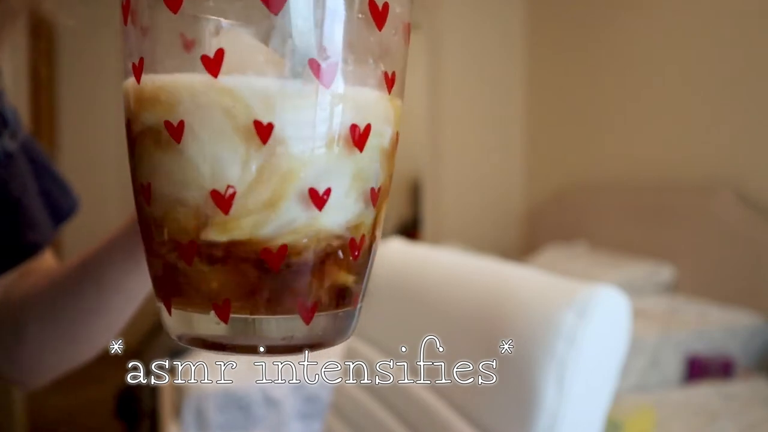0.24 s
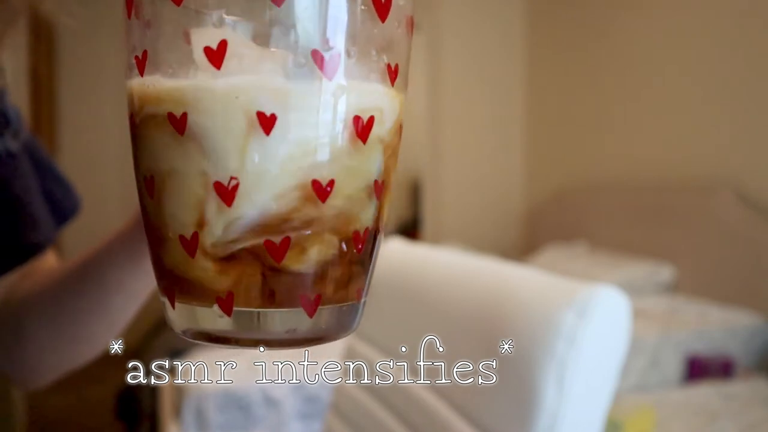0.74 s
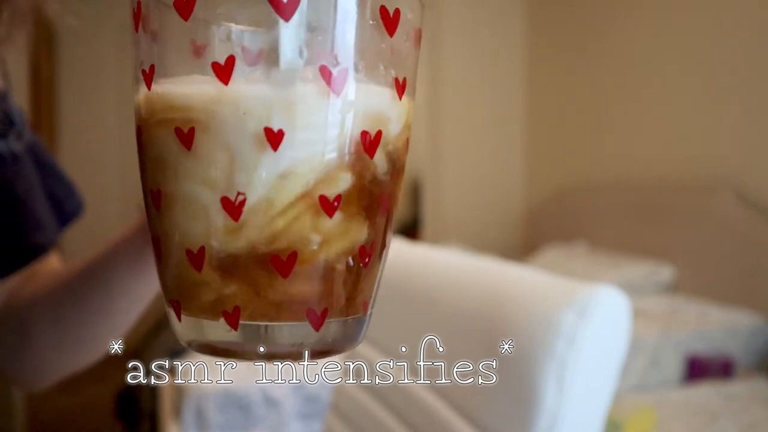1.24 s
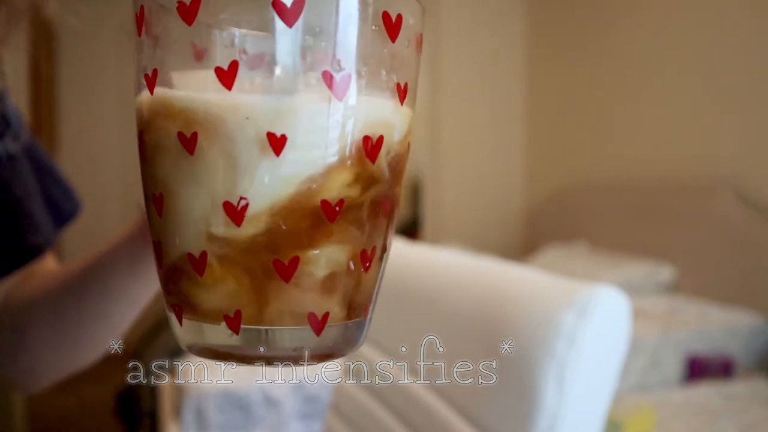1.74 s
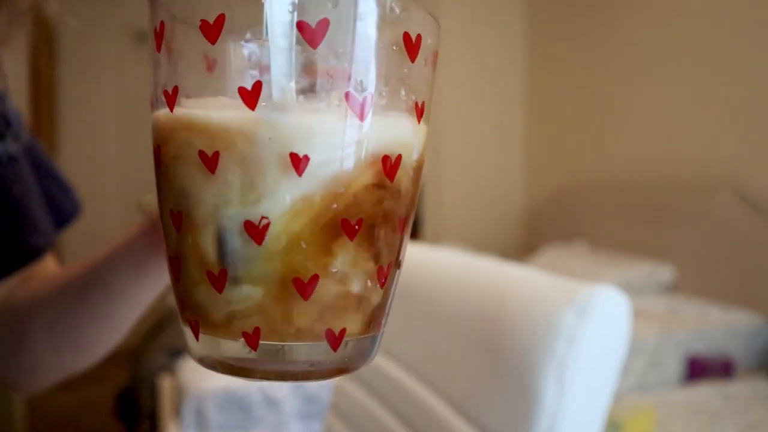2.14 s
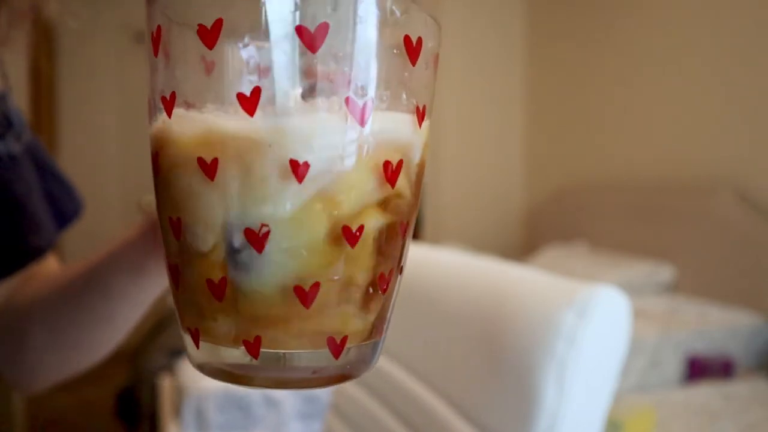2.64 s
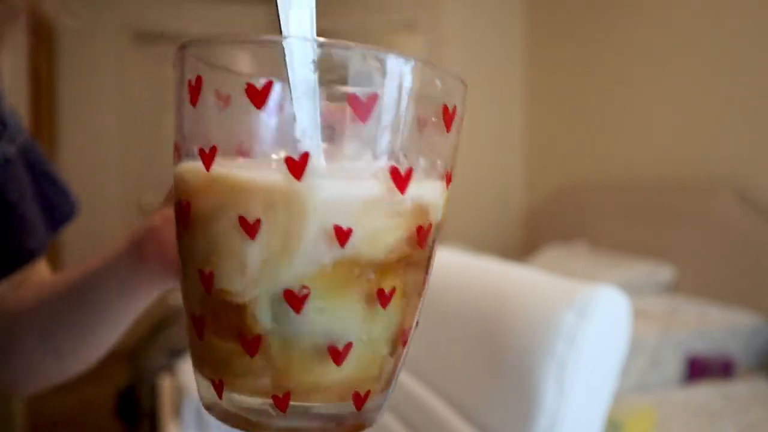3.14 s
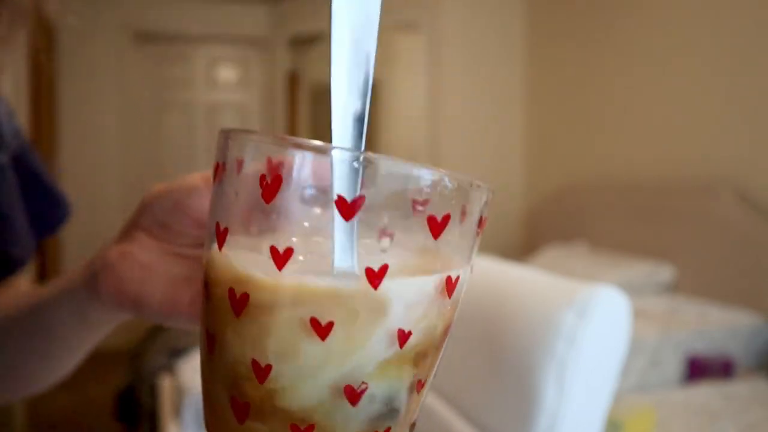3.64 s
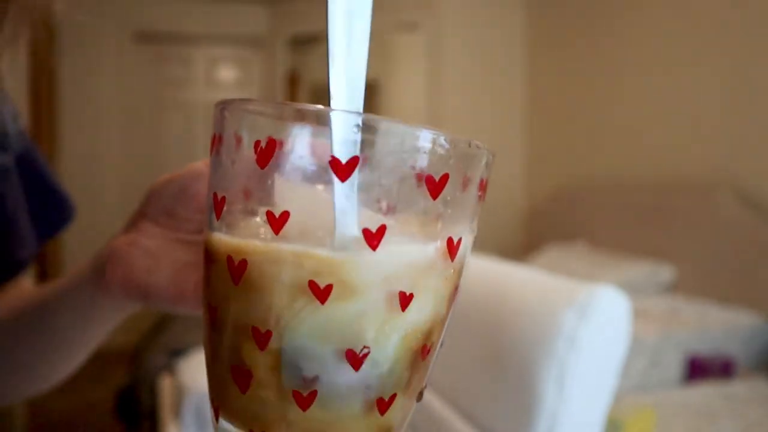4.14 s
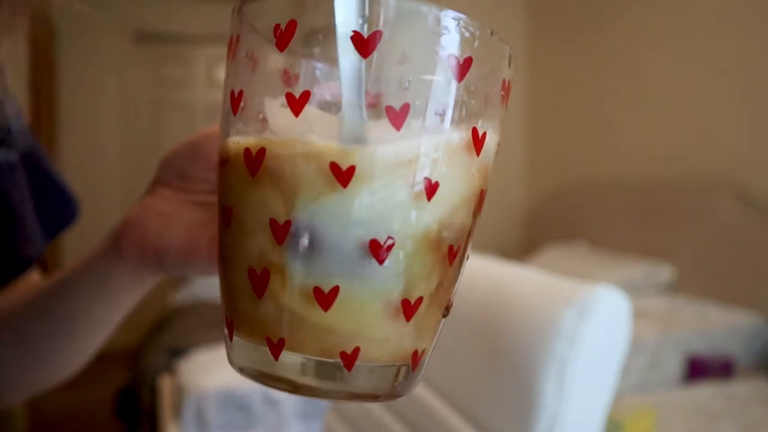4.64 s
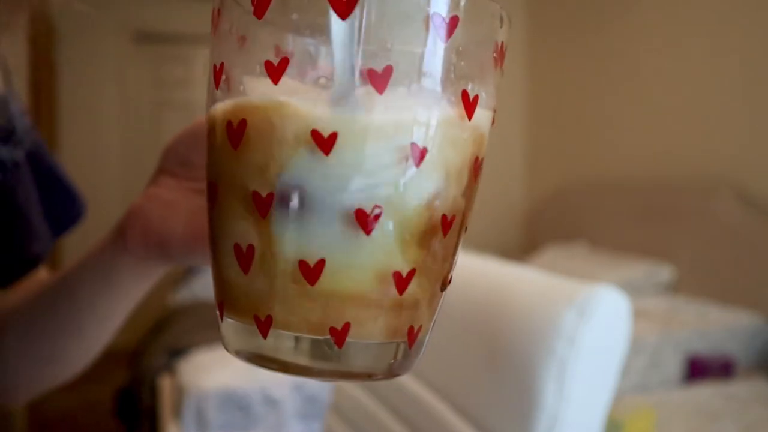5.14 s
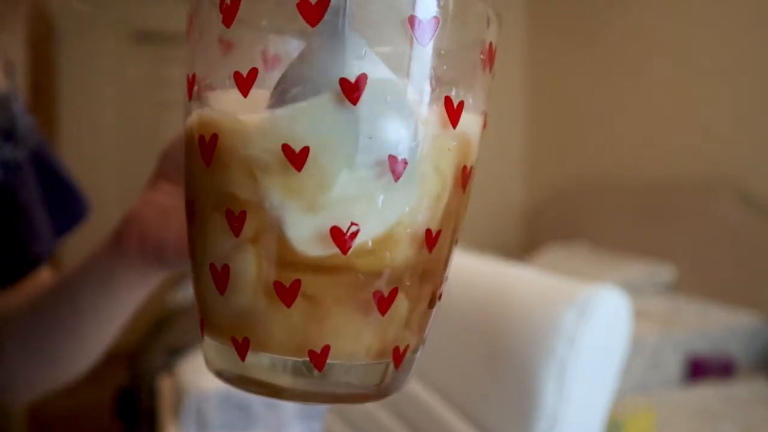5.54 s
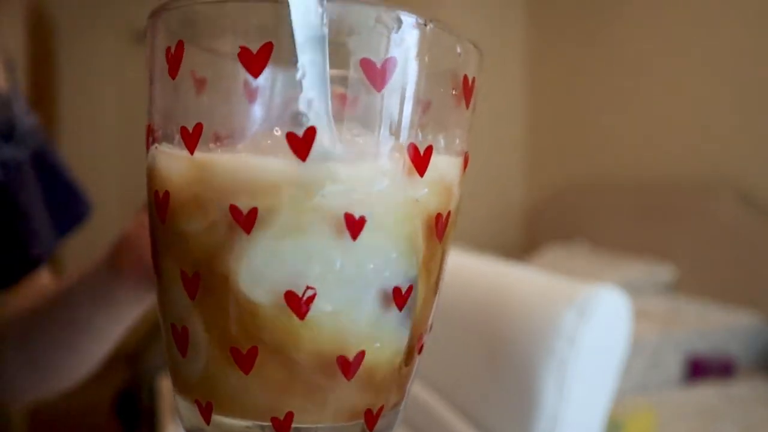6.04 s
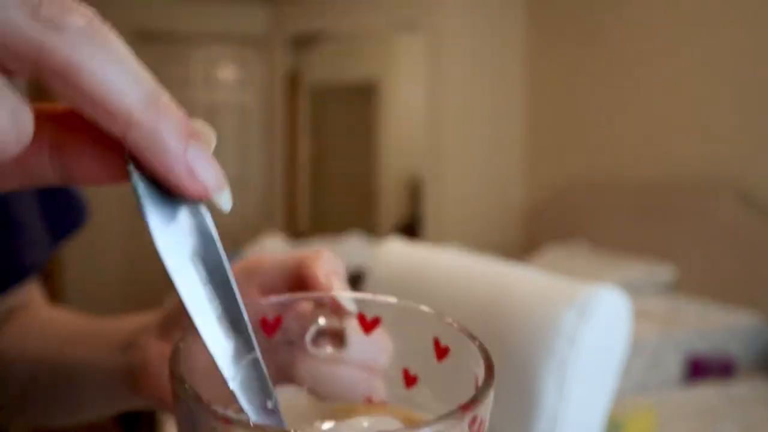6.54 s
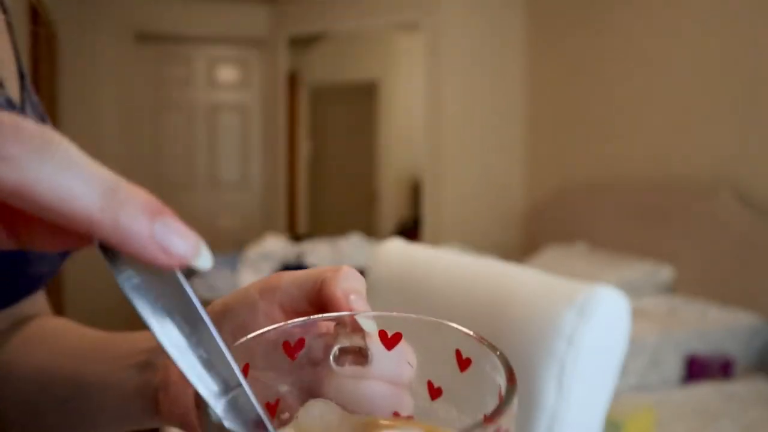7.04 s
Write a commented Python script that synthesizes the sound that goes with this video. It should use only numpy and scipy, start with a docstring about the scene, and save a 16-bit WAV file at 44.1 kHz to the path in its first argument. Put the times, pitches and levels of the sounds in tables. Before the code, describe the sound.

A steel spoon stirs an iced milky drink in a hand-held glass, clinking brightly and irregularly with dull ice clacks, close up in a small quiet room.

```python
"""Stirring an iced drink

A steel spoon stirs an iced milky drink in a hand-held glass, close to a stereo microphone.
Each clink is a sum of quickly fading tones plus a short crack of noise; the drink damps the ring.
Grazes are trains of tiny blows, and hand bumps are low sine swells. Two noisy resonances make a
hollow knock and a chatter on the rim. A small room answers with random echoes, over a faint hum."""
import sys
import numpy as np
from scipy import signal
from scipy.fft import rfft, irfft
from scipy.io import wavfile
from scipy.ndimage import uniform_filter1d, minimum_filter1d

SR = 44100
rng = np.random.default_rng(int(sys.argv[2]) if len(sys.argv) > 2 else 0)


def wrap_up_sound(samples):
    """Save the sound to the file named by the first command line argument, as 16-bit audio."""
    columns = np.atleast_2d(samples).T
    # keep every value between -1 and 1, then stretch to whole-number steps
    tamed = np.clip(columns, -1, 1)
    steps = np.round(tamed * 32767).astype(np.int16)
    wavfile.write(sys.argv[1], SR, steps)


N = 321029

SIZE = 4096  # samples in one blow
BINS = np.fft.rfftfreq(SIZE, 1 / SR)  # its frequencies in Hz
WALL_HZ = 1690  # reference pitch of the glass wall
MARGIN_S = .002  # short wait before each blow, leaving room for the lead between microphones

# edges of the ten pitch ranges in which a contact is coloured: edge_hz
REGISTERS = [1000, 1450, 2000, 2700, 3600, 4300, 5000, 5600, 8000, 9000, 13000]
# how alike the two microphones hear the glass: pitch_hz, likeness (0-1)
LIKENESS = [(1200, 0.98), (1700, 0.29), (2400, .4), (3900, 1), (6000, 0.51), (9000, .7), (12000, 0.68)]
# the spoon's tip hits the wall and bounces: start_s, level_db, favoured_steel_hz
TINGS = [(0.2883, -25, 6500), (0.8166, -23, 6200), (1.3923, -21, 4700), (1.8946, -19.5, 7900),
         (2.414, -20, 4700), (2.904, -22, 6500)]
# the spoon's bowl meets the side: start_s, level_db, brightness_db (per octave), body_db
CLINKS = [(0.0951, -52, 2.5, 6), (0.124, -38, -9.5, -1.5), (0.606, -34.5, 0.5, 6),
          (0.6275, -40, -0.5, 10.5), (0.637, -43, 3.5, 3), (0.6724, -35.5, -7.5, 2),
          (0.765, -43.5, 1.5, -7.5), (0.802, -43.5, -4.0, 7), (1.003, -45.0, -7.5, 0.5),
          (1.1899, -35.5, -0.5, -7.5), (1.216, -32.5, -2.5, 6.5), (1.309, -47, -1.5, 7),
          (1.321, -28, 1.5, 5), (1.6908, -35.5, -1.5, 0), (1.7029, -39.5, 4, -3), (2.0494, -37, 2.5, 2),
          (2.221, -35.0, -1, -3), (2.6707, -34, -11.5, 5), (2.7612, -33, 0, -2), (2.8779, -36, -4, 5.5),
          (2.977, -43, 1, -10), (3.7937, -31.5, 1, -3.5), (3.9324, -35.5, 6, 3), (3.984, -15, 4.5, -3),
          (4.161, -38, 1.0, 8.5), (4.348, -39, 3, 4.5), (4.3942, -42.5, -10.5, -3.5), (4.4872, -26, 6, 1.5),
          (4.4964, -18.5, 4, -1.5), (4.8133, -35, 3.0, -2.5), (4.853, -28, -3.5, 1), (4.9166, -32, 4, 4),
          (4.9669, -36.5, -5.5, 3), (4.9886, -22, 3.5, -2.5), (5.2733, -43, 1.5, 8),
          (5.3326, -32.5, 2.5, 0), (6.511, -43.5, -4.5, -2), (6.601, -49.0, -20, -11.5)]


def gain_of(db):
    """Turns decibels into amplitude."""
    return 10 ** (np.asarray(db) / 20)


def evened(x):
    """Scales a sound to an rms of 1."""
    return x / np.sqrt(np.mean(x ** 2) + 1e-20)


def read(points, hz):
    """Reads values between the points of a table, evenly along log frequency."""
    f, value = np.transpose(points)
    return np.interp(np.log(hz + 1), np.log(f + 1), value)


def fade(t, t60):
    """Falls by 60 dB in t60 seconds."""
    return np.exp(-np.log(1000) * t / np.maximum(t60, 1e-4))


def add(mix, s, sound):
    """Adds a sound into the mix at time s in seconds."""
    part = mix[..., round(s * SR):][..., :sound.shape[-1]]
    part += sound[..., :part.shape[-1]]


def causal(db):
    """Makes a filter with the given gains that never sounds before the blow (minimum phase)."""
    cepstrum = irfft(np.log(gain_of(db)))
    # fold the backward half of the response onto the forward half
    cepstrum[..., 1:SIZE // 2] *= 2
    cepstrum[..., SIZE // 2 + 1:] = 0
    return np.exp(rfft(cepstrum))


def pair(z, likeness):
    """Blends two unrelated spectra into partly alike left and right ones."""
    c = np.clip(likeness, -1, 1)
    return np.array([z[0], c * z[0] + np.sqrt(1 - c ** 2) * z[1]])


def air(waver=0.86, waver_hz=4, low_cut_hz=46):
    """Still room air is steady shaped noise, with hum tones whose phase and strength waver."""
    # shape of the noise before its overall level is set: pitch_hz, density_db (per Hz)
    noise_shape = [(15, -45), (25, -7.5), (76, -7.5), (114, -12.5), (217, -8), (263, -10.5), (335, -8.5),
                   (591, -14.5), (863, -13.5), (1040, -24), (1260, -19.5), (1650, -24), (2050, -26.5),
                   (2410, -25.5), (16000, -57.5)]
    # how alike left and right noise are: pitch_hz, likeness (0-1)
    air_likeness = [(60, .995), (180, .92), (350, .78), (700, .55), (1500, .2), (5000, 0)]
    # hum tones: pitch_hz, level_db (rms)
    hum_tones = [(73, -74.5), (334, -79.5)]
    air_db = -63.5  # rms
    hz, t = np.fft.rfftfreq(N, 1 / SR), np.arange(N) / SR
    z = pair(rfft(rng.standard_normal((2, N))), read(air_likeness, hz))
    z = z * hz ** 2 / np.sqrt(hz ** 4 + low_cut_hz ** 4)
    noise = irfft(z * gain_of(read(noise_shape, hz)), N)
    out = gain_of(air_db) * evened(noise)
    for hum_hz, db in hum_tones:
        slow = rfft(rng.standard_normal(N)) * np.exp(-(hz / waver_hz) ** 2)
        drift = evened(irfft(slow, N))
        tone = np.sin(2 * np.pi * hum_hz * t + drift)
        # the same drift, one second later, moves the strength
        out = out + gain_of(db) * evened(tone * (1 + waver * np.roll(drift, SR)))
    return out


def strike(wall_hz, t60, crack_db=1, crack_t60=0.005, spread_db=4, detune=.016):
    """A blow sets off fading tones of glass and spoon plus a short crack, seen from two sides."""
    # tones of the filled glass and the spoon: pitch_hz, level_db, share of the ring's t60 (ratio)
    modes = [(1050, -30, .4), (1319.6, -6, 3.4), (1595.5, 1.5, 1.0), (1692, 3.5, 1.4), (1808, -3, 0.18),
             (2200, -12.5, 0.72), (2560, -3.5, 0.31), (3056, -3, .45), (3143, -1, 0.48), (3887, 0.5, 0.93),
             (3978, 3.5, 0.76), (4360, -11, .5), (4600, -5.5, .45), (4740, -1.5, .5), (5000, -9.5, .4),
             (5540, -7.5, 0.43), (6224, -3.5, 0.34), (6500, -7.5, 0.49), (6920, -3, 0.48),
             (7300, -4.5, 0.22), (7700, -5.5, 0.43), (8420, -6, .5), (8500, -10.5, 0.17), (9440, -7, .4),
             (10410, -4, 0.36), (10950, -6, 0.43), (12050, -5.5, 0.5)]
    # how strongly the glass sends out sound: pitch_hz, gain_db
    radiation = [(200, -72), (600, -43), (860, -26.5), (980, -4), (12000, 2.5), (12600, -13.5),
                 (14000, -17), (16500, -26)]
    t = np.arange(SIZE) / SR
    hz, db, share = np.transpose(modes)
    low = hz < REGISTERS[2]
    # the drink climbs and falls on the wall and shifts its lowest tones
    hz = np.where(low, hz * wall_hz / WALL_HZ, hz)
    hz = hz * (1 + detune * rng.standard_normal(len(hz)))
    # low tones all start with the push; the point of contact decides the signs of the others
    push_sign = rng.choice([-1, 1], (2, 1))
    sign = np.where(low, push_sign, rng.choice([-1, 1], (2, len(hz))))
    weight = sign * gain_of(db + spread_db * rng.standard_normal((2, len(hz))))
    # the second side is a quarter of a cycle on
    side_phase = np.array([0, np.pi / 2])[:, None, None]
    phase = 2 * np.pi * hz[:, None] * t + side_phase
    fading = np.sin(phase) * fade(t, t60 * share[:, None])
    ring = np.sum(weight[..., None] * fading, 1)
    crack = gain_of(crack_db) * rng.standard_normal((2, SIZE)) * fade(t, crack_t60)
    return rfft(ring + crack) * causal(read(radiation, BINS))


def touch(ting_hz, knock_db, ting_db=8, ting_width_hz=520, full_knock_db=-12):
    """A point of contact favours a group of steel tones; a light touch misses the deepest ones."""
    steel = ting_db / (1 + ((BINS - ting_hz) / ting_width_hz) ** 2)
    depth = np.clip((REGISTERS[1] - BINS) / (REGISTERS[1] - REGISTERS[0]), 0, 1)
    return causal(steel + depth * np.clip(knock_db - full_knock_db, -20, 0))


def voiced(z, levels_db, order=11, count=3):
    """Sets the strength of each pitch range by repeated smooth filtering, for bright or dull contacts."""
    register = np.digitize(BINS, REGISTERS[1:-1])
    member = register[:, None] == np.arange(len(levels_db))
    member = member * (BINS > REGISTERS[0])[:, None]
    for _ in range(count):
        # power as if the whole blow lasted a hundredth of a second
        power = 2 * abs(z) ** 2 @ member / (SIZE * SR * .01)
        lift_db = (levels_db - 10 * np.log10(power + 1e-20))[:, register]
        smooth_db = uniform_filter1d(uniform_filter1d(lift_db, 2 * order + 1), order)
        z = z * causal(smooth_db)
    return z


def microphones(z, left_db=0, lean_below_hz=5000):
    """Two microphones hear the glass with differing level and timing; low tones lean to one side."""
    # left against right level: pitch_hz, left_minus_right_db
    balance = [(1200, 2.5), (1700, -1), (2400, -3.5), (3200, 2), (4000, 5.5), (4800, 2), (6000, 0.5),
               (8000, -0.5), (12000, -2)]
    # how far left is ahead of right: pitch_hz, lead (radians)
    lead = [(1200, -0.63), (1750, -1.02), (2300, 0.79), (3200, 0.69), (4000, 0.99), (6000, .9), (8000, 1.2),
            (10000, 1.8), (12000, 1.9)]
    balance_db = read(balance, BINS) + left_db / (1 + (BINS / lean_below_hz) ** 2)
    lean = gain_of(balance_db / 2) * np.exp(.5j * read(lead, BINS))
    ports = np.array([lean, 1 / lean]) * np.exp(-2j * np.pi * BINS * MARGIN_S)
    ports = ports / np.sqrt(np.mean(abs(ports) ** 2, 0))
    sound = irfft(pair(z, read(LIKENESS, BINS)) * ports)
    # full for the first half of the block, then fading to silence
    return sound * np.minimum(2 * np.linspace(1, 0, SIZE), 1) ** 2


def contact(db, brightness_db, body_db, colour_db, wall_hz, ting_hz, t60, rebound, left_db,
            steel_db=0, rebound_s=.0039, steel_width_hz=520):
    """A contact rings the glass, and a weaker second blow follows as it rebounds."""
    # how far each pitch range follows the body setting: share (0-1)
    body_share = [.8, 0, .8, 1, .5, 0, 0, 0, 0, 0]
    # this hard or harder rebounds in full; softer contacts rebound less (dB per dB)
    hard_db, rebound_slope = -20.5, .6
    centres = np.sqrt(np.multiply(REGISTERS[:-1], REGISTERS[1:]))
    octaves = np.maximum(np.log2(centres / WALL_HZ), 0)
    steel = steel_db / (1 + ((centres - ting_hz) / steel_width_hz) ** 2)
    levels_db = db + np.array(colour_db) + brightness_db * octaves
    levels_db = levels_db + body_db * np.array(body_share) + steel
    share = rebound * gain_of(rebound_slope * min(db - hard_db, 0))
    delay_s = rebound_s * rng.uniform(.92, 1.08)
    bounce = share * np.exp(-2j * np.pi * BINS * delay_s)
    z = strike(wall_hz, t60) + bounce * strike(wall_hz, t60)
    z = z * touch(ting_hz, levels_db[0] - levels_db[1])
    return microphones(voiced(z, levels_db), left_db)


def clinks():
    """Spoon and ice strike the glass, each in the manner of its kind."""
    # deep blows low on the glass: start_s, level_db, brightness_db (per octave), body_db,
    # favoured_steel_hz
    knock_rows = [(1.045, -19.5, 0, 0.5, 7200), (2.0611, -19.5, -1.5, 0, 4500),
                  (2.5556, -22.5, -.5, -3, 4600), (4.175, -19.5, 2, 4, 5300), (4.7018, -24, 1, 3, 6700),
                  (5.281, -26.5, 0.5, 0, 4600), (6.206, -21.5, -2.5, 3.5, 5250),
                  (6.2113, -22.5, -2, -0.5, 5150), (6.7709, -19.5, -.5, -2.5, 8300)]
    # dull, short clacks of ice: start_s, level_db, brightness_db (per octave), body_db
    clack_rows = [(0.5625, -70, 9.5, 14.5), (1.568, -24, 0.5, 0), (1.7101, -25, -2.5, 6),
                  (1.829, -34.5, 4.5, -3), (1.8369, -31.5, -0.5, 1.5), (2.2431, -23.5, 0, -1),
                  (2.7173, -43, 1, -9), (2.7748, -23, -1, 4), (3.3188, -31, -5, 3.5),
                  (3.3801, -31, -3, 1.5), (3.8635, -23.5, 1.5, 2.5), (4.2798, -29.5, -6.5, -3.5),
                  (4.8927, -25, 2.5, -3), (5.347, -28.5, 1, 0), (5.402, -27, 0, -0.5),
                  (6.265, -36.5, 0.5, -2.5), (6.4394, -29, 2.0, 3), (6.451, -42, 0, 0),
                  (6.4923, -49.5, 7.5, -5.5)]
    # thin ticks of the handle on the rim: start_s, level_db, brightness_db (per octave), body_db
    tick_rows = [(0.2426, -56, 2, -21), (0.7819, -35.5, -4.5, -6), (1.6548, -47.5, -6, -1),
                 (1.8679, -44, 1.5, -8), (2.0215, -67.5, 11.5, -10), (2.1582, -57.5, -1.0, 6),
                 (2.3819, -41, 2, 3), (2.8597, -39, -1, 3), (3.2883, -64.5, 2, 1), (5.2234, -61.5, -6.5, 3),
                 (5.5685, -70, -0.5, 2)]
    # ways of touching: colour_db (per pitch range), wall_hz, ting_hz (favoured steel tones) or
    # steel_db (how far they stand out), t60 (s), rebound (0-1), left_db (lean to the left)
    ting_kind = dict(colour_db=[-21.5, 0.5, -10.5, -16.5, -4, -4.5, -18.5, -1, -15, -1],
                 wall_hz=1622, steel_db=2, t60=0.035, rebound=0.65, left_db=3.5)
    # a deep blow: same columns, with steel_db
    knock_kind = dict(colour_db=[-15.5, -0.5, -7, -5.5, -5, -13.5, -15, -9.5, -13, -12.5],
                  wall_hz=1732, steel_db=7.5, t60=.023, rebound=0.26, left_db=-0.5)
    # an ice clack: same columns, with ting_hz
    clack_kind = dict(colour_db=[-30, -0.5, -11.5, -5, -2.5, -15, -24, -20, -25.5, -26],
                  wall_hz=1730.5, ting_hz=8400, t60=.018, rebound=.05, left_db=3)
    # a clink of the bowl: same columns, with ting_hz
    clink_kind = dict(colour_db=[-27, 0, -16, -13, -8, -16.5, -22.5, -15, -23.5, -20.5],
                  wall_hz=1702.5, ting_hz=4700, t60=.032, rebound=.35, left_db=1.5)
    # a tick of the handle: same columns, with ting_hz
    tick_kind = dict(colour_db=[-22, 0.5, -17, -8, 8.5, -0.5, -10, 4, -15.5, -4.5],
                 wall_hz=1730, ting_hz=6300, t60=0.025, rebound=.1, left_db=3.5)
    out = np.zeros((2, N))
    for s, db, ting_hz in TINGS:
        add(out, s - MARGIN_S, contact(db, 0, 0, ting_hz=ting_hz, **ting_kind))
    for s, db, brightness_db, body_db, ting_hz in knock_rows:
        add(out, s - MARGIN_S, contact(db, brightness_db, body_db, ting_hz=ting_hz, **knock_kind))
    for rows, kind in [(clack_rows, clack_kind), (CLINKS, clink_kind), (tick_rows, tick_kind)]:
        for s, db, brightness_db, body_db in rows:
            add(out, s - MARGIN_S, contact(db, brightness_db, body_db, **kind))
    return out


def slide(length, db, slips_per_s=260, uneven_db=4, ring_t60=.035):
    """A sliding spoon catches and slips: a train of tiny soft blows on the same glass."""
    # softness of the blows: pitch_hz, gain_db
    softness = [(1000, -21.5), (1400, -15.0), (1650, 2), (2200, -7.5), (4000, -11.5),
                (7000, -19.0), (12000, -25.0)]
    n = max(round(length * SR), 2)
    slips = rng.random(n) < slips_per_s / SR
    slips = slips * gain_of(uneven_db * rng.standard_normal(n))
    slips[0] = 1
    ring = microphones(strike(WALL_HZ, ring_t60) * causal(read(softness, BINS)))
    sound = signal.fftconvolve(slips[None], ring, axes=1)
    # level counts all the energy, ring included, over the length of the slide
    return gain_of(db) * sound / np.sqrt(np.sum(sound ** 2) / (2 * n))


def grazes():
    """The spoon slides into each ting, drags faintly after each clink, and scrapes a few times."""
    # longer scrapes along the glass: start_s, end_s, level_db
    scrapes = [(0.767, .811, -47), (1.531, 1.575, -51), (2.024, 2.066, -58.5), (3.3, 3.416, -50.5),
               (3.786, 3.851, -44.5), (3.911, 3.99, -45), (4.291, 4.422, -51), (4.81, 4.945, -50.5),
               (5.302, 5.435, -58)]
    run_up_s, run_up_db = 0.032, -25.5  # level against the ting
    drag_s, drag_db = .03, -60.5
    out = np.zeros((2, N))
    for s, db, _ in TINGS:
        add(out, s - run_up_s, slide(run_up_s, db + run_up_db))
    for s, *_ in CLINKS:
        add(out, s, slide(drag_s, drag_db))
    for start, end, db in scrapes:
        add(out, start, slide(end - start, db))
    return out


def room(x, first_s=0.0056, build_s=0.0013, half_cycles_per_s=1.3, count=3):
    """Walls send back dense echoes that die by pitch; their pattern changes as the glass moves."""
    # how long echoes last: pitch_hz, t60_s
    echo_t60 = [(600, 0.37), (1700, 0.1837), (4000, 0.2365), (8000, 0.21), (13000, 0.2)]
    # how strongly the room answers: pitch_hz, gain_db
    echo_db = [(600, -8), (1700, -8.5), (2700, -10), (4000, -15.5), (7000, -15.5), (12000, -14)]
    t = np.arange(SR // 2) / SR
    source, wet = (x[0] + x[1]) / 2, np.zeros((2, N))
    for k in range(count):
        # scattered random echoes, none before the first
        taps = rng.standard_normal((2, len(t))) * (rng.random((2, len(t))) < .15)
        taps = taps * np.clip((t - first_s) / build_s, 0, 1)
        hz, age, z = signal.stft(taps, SR, nperseg=128)
        z = z * fade(age, read(echo_t60, hz)[:, None])
        plain = signal.istft(z, SR)[1]
        coloured = signal.istft(z * gain_of(read(echo_db, hz))[:, None], SR)[1]
        tail = coloured / np.sqrt(np.sum(plain ** 2) / 2)
        # the echo patterns take turns smoothly
        place = np.cos(np.pi * (half_cycles_per_s * np.arange(N) / SR + k / count))
        place = place * np.sqrt(2 / count)
        wet += signal.fftconvolve(place * (x + source) / np.sqrt(3), tail, axes=1)[:, :N]
    return wet


def bumps():
    """The hand that holds the glass makes low, soft swells of a few cycles."""
    # bumps: start_s, level_db (top of the swell), pitch_hz, length_s
    bump_rows = [(1.653, -53, 64, 0.1), (6.225, -48.5, 84, 0.046), (7.144, -52.5, 68.6, 0.11)]
    out = np.zeros((2, N))
    for s, db, hz, length in bump_rows:
        t = np.arange(round(length * SR)) / SR
        swell = np.sin(np.pi * t / length)
        add(out, s, gain_of(db) * np.sin(2 * np.pi * hz * t) * swell)
    return out


def ringing(s, bands, swell_s=.008):
    """Unevenly shaken resonances are narrow noise that swells after a blow, flutters and dies."""
    t, out = np.arange(SR // 2) / SR, np.zeros((2, N))
    f = np.fft.rfftfreq(len(t), 1 / SR)
    for hz, width, db, t60 in bands:
        z = pair(rfft(rng.standard_normal((2, len(t)))), read(LIKENESS, hz))
        z = z / (1 + (2 * (f - hz) / width) ** 4)
        noise = evened(irfft(z, len(t)))
        # db is the rms before the swell and fade
        add(out, s, gain_of(db) * noise * fade(t, t60) * (1 - fade(t, swell_s)))
    return out


def hollow_knock():
    """The drink answers one deep blow with a brief hollow resonance."""
    # its resonances: pitch_hz, width_hz, level_db, t60_s
    hollow_bands = [(665, 110, -43, .075), (1020, 130, -24.5, .04)]
    return ringing(4.1755, hollow_bands)


def rim_chatter():
    """The spoon's handle chatters to rest against the rim as fluttering resonances."""
    # its resonances: pitch_hz, width_hz, level_db, t60_s
    rim_bands = [(1708, 300, -25.5, 0.25), (2580, 2100, -35.5, 0.12), (3925, 230, -29.5, 0.24),
                 (8170, 520, -32.5, 0.14), (11900, 230, -53.5, 0.18)]
    return ringing(6.7715, rim_bands)


def scene():
    """Adds up the glass, the room's answer to it, the hand and the still air."""
    glass = clinks() + grazes() + hollow_knock() + rim_chatter()
    return glass + room(glass) + bumps() + air()


def record(dry, size=130):
    """A quick limiter holds back the sharpest peaks, then a filter removes the highest treble."""
    edge_hz = 16500
    gain = 1 / np.maximum(abs(dry).max(0), 1)
    # hold the lowest gain over size samples, then smooth it
    limited = dry * uniform_filter1d(minimum_filter1d(gain, size), size)
    low_pass = signal.firwin(511, edge_hz, window=("kaiser", 9), fs=SR)
    return signal.oaconvolve(limited, low_pass[None], "same")


dry = scene()
out = record(dry)
wrap_up_sound(out)
```